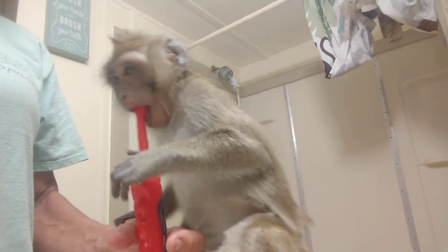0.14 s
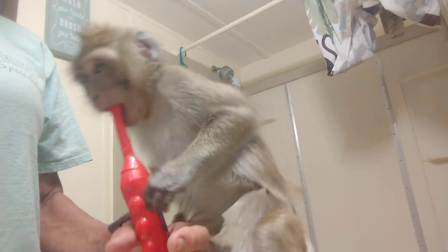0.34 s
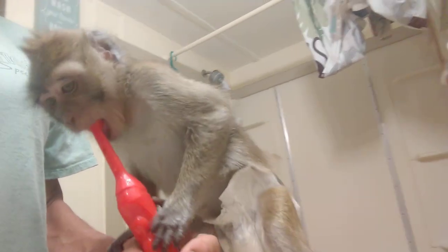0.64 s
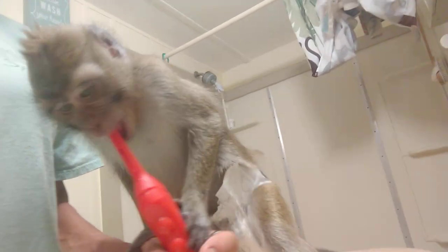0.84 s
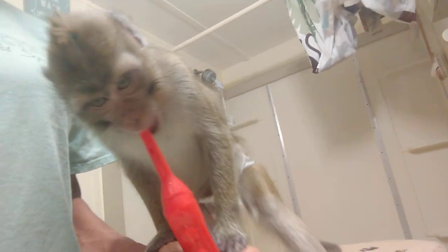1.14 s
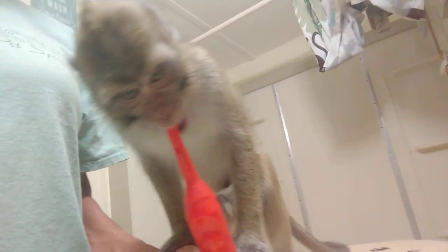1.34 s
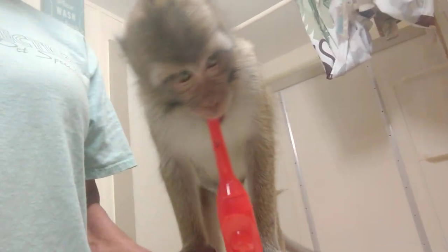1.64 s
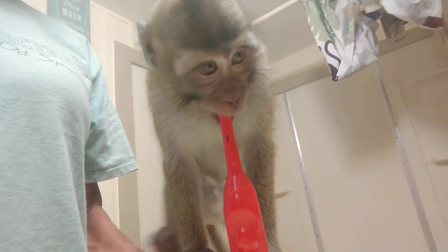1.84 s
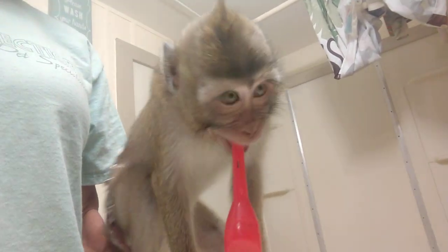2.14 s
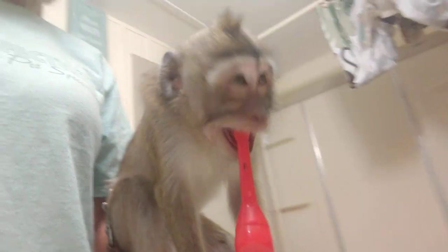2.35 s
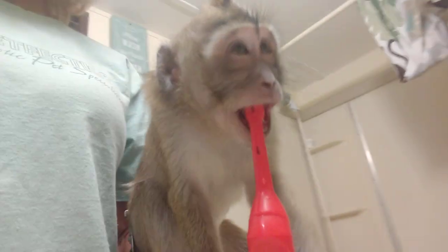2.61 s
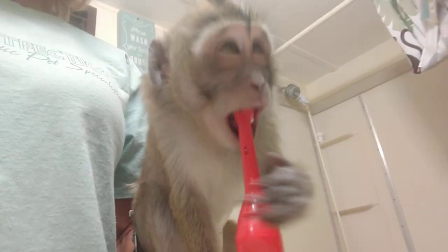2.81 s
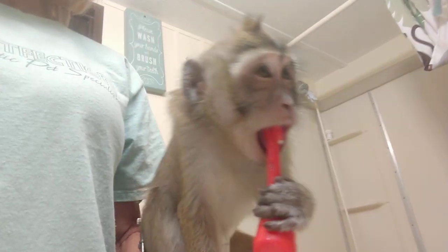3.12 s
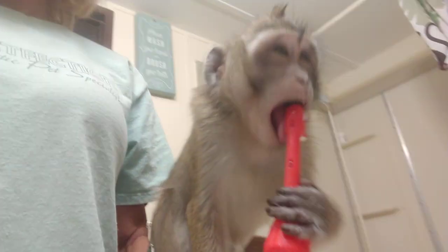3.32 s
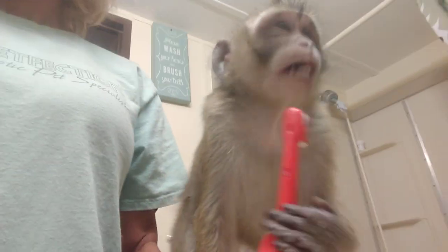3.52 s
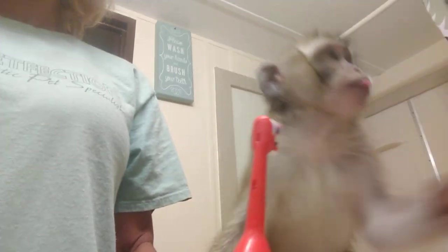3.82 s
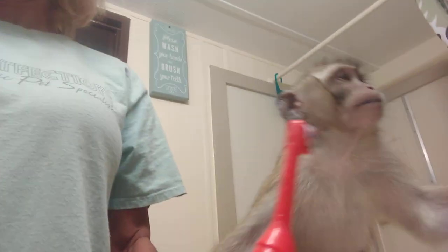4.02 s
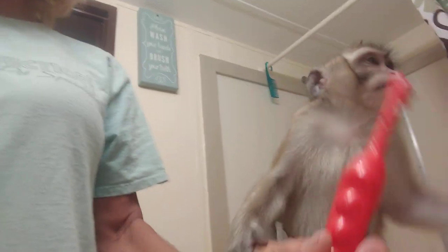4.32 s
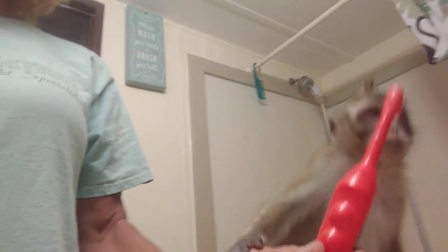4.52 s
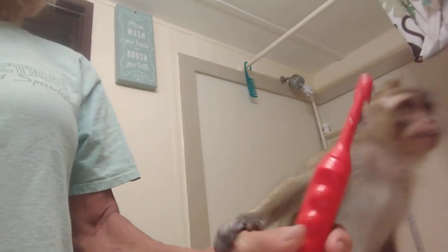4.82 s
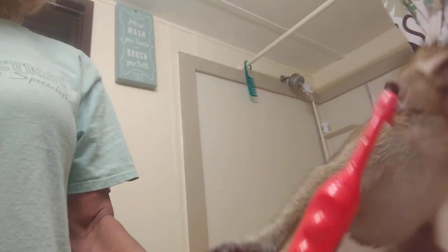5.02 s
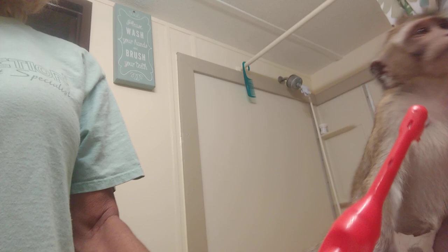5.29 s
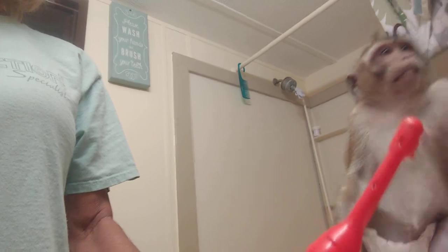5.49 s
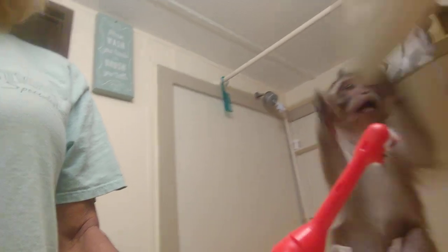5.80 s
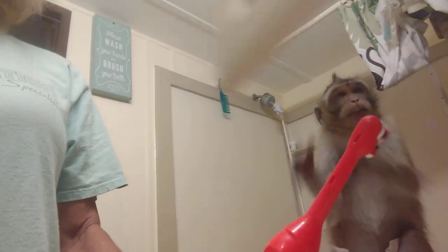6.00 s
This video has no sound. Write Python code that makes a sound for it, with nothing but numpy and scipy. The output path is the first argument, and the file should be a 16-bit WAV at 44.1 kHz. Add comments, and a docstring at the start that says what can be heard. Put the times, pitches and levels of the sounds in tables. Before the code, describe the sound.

In a small hard-walled bathroom, a battery toothbrush buzzes continuously very near the microphone. A monkey's bites drag the motor down in pitch and make the buzz rough and clattery, with brief slips and surges. Once released, it runs steadier, clearer and slightly higher, with thin singing tones. Paws then scrape plastic in quick dry scuffs, with soft low bumps as the animal clambers away.

```python
"""Monkey chewing a battery toothbrush

In a small bathroom a brush buzzes while a monkey chews on its head, then the monkey clambers off.
The buzz is two gear knocks a turn ringing through a shell; bites slow the motor and roughen the strokes.
Hum and singing tones follow the turns. Scuffs and the rustle are shaped noise, bumps are short low booms."""
import sys
import numpy as np
from scipy import signal
from scipy.fft import rfft, irfft
from scipy.io import wavfile
from scipy.ndimage import uniform_filter1d, map_coordinates

SR = 44100
rng = np.random.default_rng(int(sys.argv[2]) if len(sys.argv) > 2 else 0)


def store_pcm(level_fs):
    """Save levels as 16-bit WAV."""
    pcm = np.round(np.clip(level_fs, -1, 1) * 32767).astype(np.int16)
    wavfile.write(sys.argv[1], SR, np.atleast_2d(pcm).T)


N = 271215
TIME = np.arange(N) / SR

# motor speed, dragged down by each bite: time_s, speed_turns_per_s
MOTOR_SPEED = [(0.0, 82.4), (0.2, 82.6), (0.42, 82.7), (0.58, 78.8), (0.7, 81.7), (0.78, 81.3),
               (0.88, 83.7), (0.98, 84.5), (1.12, 68.2), (1.25, 64.5), (1.48, 67.5), (1.8, 65.9),
               (1.9, 73.9), (2.02, 81.4), (2.14, 82.8), (2.28, 81.5), (2.52, 69.2), (2.6, 67.9),
               (2.7, 78.7), (2.85, 84.1), (3.02, 85.1), (3.16, 80.5), (3.33, 80.0), (3.44, 82.5),
               (3.58, 85.8), (4.2, 86.5), (4.8, 86.7), (6.15, 87.6)]
# how far the mouth encloses the head: time_s, bite (0-1)
BITE = [(0, 0.37), (.45, 0.89), (3.35, 0.76), (3.74, 0.27), (6.15, 0.07)]
# where the brush is: time_s, left_lag_ms, left_minus_right_db
PLACE = [(0, 0.066, -6), (2.5, -0.13, -5), (5.2, -0.1, -4.5), (6.15, -0.16, -4.5)]
# soft stroke against the hard one, clacking when the teeth press: time_s, level_db (before dulling)
SOFT_STROKE_LEVEL = [(0, 5), (.4, 1), (.6, 2.5), (.71, 5.5), (.8, 4.5), (1.15, 4.5), (1.3, -3), (1.85, 1),
                     (2.3, -3.5), (2.64, -4), (2.71, -4), (2.78, -4.5), (3.05, -7.5), (3.13, 1.5),
                     (3.4, -1), (3.7, -4.5), (6.15, -3)]
# colour of the brush running free: pitch_hz, level_db
FREE_COLOUR = [(150, -74), (450, -43), (650, -33.5), (820, -19), (980, -21.5), (1130, -14), (1600, -16.5),
               (2000, -10), (2300, -9), (3000, -6), (3600, -14.5), (4400, -13.5), (5100, -7), (6000, -16.5),
               (7000, -5), (8200, -7), (10000, -24), (12000, -14), (13800, -10.5), (14900, -9),
               (15400, -27), (16000, -13)]
# colour of the brush bitten: pitch_hz, level_db
BITTEN_COLOUR = [(150, -70), (500, -47), (660, -27.5), (900, -29.5), (1270, -15.5), (1600, -18.5),
                 (2300, -7.5), (2900, -7), (3500, -6.5), (4400, -3), (5300, -1.5), (6200, -1.5), (7300, -2),
                 (10000, -10), (12600, -5), (14700, -9), (16000, -6.5)]
# resonances of the undamped shell: pitch_hz, width_hz, level_db
SHELL = [(1896, 520, 5), (2380, 124, -12), (2716, 200, -9.5), (4113, 290, 4.5), (4980, 280, 0.5),
         (6640, 270, -8)]
# resonances let out by each hold of jaw or hand: start_s, end_s, first_hz, last_hz, width_hz, level_db
HOLDS = [(0, 0.467, 7300, 7140, 400, -4.5), (0.275, 0.92, 5360, 5300, 463, 9),
         (0.424, 0.63, 2120, 2270, 250, 4), (0.443, .9, 7100, 7240, 300, 2),
         (0.927, 1.109, 5140, 5550, 1000, 11), (1.064, 1.36, 5400, 5450, 900, -9),
         (0, 0.457, 2420, 2370, 200, 6), (0, .42, 1270, 1270, 199, 3), (1, 1.213, 3100, 3330, 300, 6.5),
         (1.05, 1.547, 8850, 9800, 600, -2), (1.414, 1.646, 1370, 1410, 198, 8),
         (1.655, 2.01, 5030, 5200, 250, 6), (2.283, 2.597, 6900, 6500, 396, -1),
         (2.624, 2.9, 5630, 5400, 375, 6), (2.665, 2.975, 7710, 8000, 370, 9),
         (2.945, 3.475, 7100, 5960, 350, 2.5), (3.068, 3.733, 12100, 14400, 900, 2),
         (3.133, 3.564, 1770, 1770, 149, 1), (3.68, 4.25, 4900, 4830, 400, -10),
         (3.654, 5.196, 2100, 2030, 200, -9), (4.598, 5.752, 5020, 4830, 400, 2.5),
         (5.704, 6.25, 2410, 2520, 152, 6.5)]
# ring of the undamped head at each hard stroke: pitch_hz, width_hz, level_db (before the low cut)
HEAD_TICK = [(5160, 730, -0.5), (5090, 310, -5), (14860, 2200, -3)]
# slow level of the buzz, before load and contact: time_s, lows_db, middle_db, treble_db
BUZZ_LEVEL = [(0, -43.5, -39.5, -48), (.5, -44.5, -36.5, -45), (1.3, -42.5, -35.5, -43.5),
              (1.85, -43, -36, -42), (2.6, -40, -35.5, -39.5), (3.198, -38.5, -34, -39.5),
              (3.631, -42, -36.5, -35.5), (3.73, -37.5, -32, -36.5), (4.302, -37, -35, -38.5),
              (4.85, -41, -34, -40.5), (5.3, -40.5, -34.5, -37.5), (6.15, -36.5, -33, -37.5)]
# answer of lows, middle, treble (one row each): load_db per turn/s of slowing, contact_share (ratio)
TEETH_ANSWER = [(.02, .66), (.11, 1.0), (.28, 1.25)]
# head slides onto the lips, then snaps back on the teeth: start_s, caught_s, level_db (before contact_share)
SLIPS = [(0.4, 0.435, -2), (0.67, 0.697, -5.5), (0.786, 0.93, -8), (1.847, 2.127, -4), (2.045, 2.269, -5.5),
         (3.05, 3.097, -3)]
# head rattles hard on the teeth: peak_s, rise_and_fall_s (each), level_db (before contact_share)
SURGES = [(0.614, 0.072, 3), (.735, 0.021, 1.5), (1.091, 0.098, 7), (2.46, 0.048, 3.5), (2.84, 0.069, 4.5)]
# motor hum, before its level curve: turn_multiple (ratio), level_db
HUM = [(1, -87), (2, -81), (3, -69), (4, -78.5), (5, -82), (6, -93)]
# level curve of the hum: time_s, gain_db
HUM_LEVEL = [(0, -15), (.5, -3), (.95, -10), (1.15, 4), (1.5, 2), (1.75, -11), (2.35, 2.5), (3.05, 1.5),
             (3.3, -2), (6.15, -8)]
# tones of the unloaded handle: turn_multiple (ratio), upright_db, tilted_db
HANDLE_TONES = [(12, -66, -54), (13, -43.5, -50), (14, -65, -44.5), (16, -43, -43.5), (20, -60, -64),
                (22, -37, -56), (27, -45, -45), (28, -47, -45.5), (35, -35, -60), (48, -35.5, -37),
                (55, -30.5, -40), (58, -37, -40)]
# how far the handle leans over: time_s, tilt (0-1)
HANDLE_TILT = [(4.2, 0), (5.3, 0.96)]
# paws scuffing plastic, before the room: start_s, level_db, decay_s, treble_db
SCUFFS = [(4.105, -34, 0.0076, -12), (4.242, -40, 0.035, 3), (4.308, -29.5, 0.01, -7),
          (4.353, -25, 0.0058, 3.5), (4.411, -34.5, 0.026, -27), (4.476, -32, 0.029, -2),
          (4.567, -24.5, 0.014, -3), (4.635, -45, 0.066, 0), (4.696, -29, 0.028, -11),
          (4.769, -25.5, 0.012, -8), (5.229, -35.5, 0.017, -23)]
# colour of the scuffs: pitch_hz, level_db
SCUFF_COLOUR = [(50, -32), (200, -23.5), (500, -6), (850, 2), (1500, -3.5), (2500, 2), (4000, -1.5),
                (7000, -5), (10000, -4.5), (15000, -2)]
# soft bumps of body and paws, before the room: start_s, level_db, pitch_hz, attack_s, decay_s
BUMPS = [(0.088, -52, 178, .003, 0.047), (0.706, -55, 212, .003, 0.026), (.76, -56, 192, 0.0064, 0.061),
         (2.403, -52, 254, 0.0035, 0.016), (2.429, -56, 197, 0.0079, 0.045),
         (2.532, -54.5, 183, 0.0058, 0.024), (2.871, -61.5, 224, .01, 0.071),
         (3.669, -52.5, 534, .001, 0.0089), (4.307, -52, 244, 0.014, 0.076), (4.405, -52, 207, .012, 0.057),
         (4.472, -52, 195, .012, 0.039), (4.57, -54, 241, 0.0036, 0.066), (4.696, -39, 220, 0.011, 0.02),
         (4.762, -47.5, 209, .012, 0.029), (4.9, -47.5, 215, .004, 0.028), (5.116, -43, 151, .03, 0.027),
         (5.227, -52, 258, 0.0088, 0.021), (5.477, -54, 175, 0.012, 0.028),
         (5.812, -59.5, 141, 0.013, 0.097)]
# faint movements between the bumps, before the room: time_s, level_db
SHUFFLE_LEVEL = [(0, -81.5), (2.1, -84.5), (2.5, -76), (3.15, -79), (3.4, -80.5), (4.1, -84.5), (4.4, -70),
                 (4.9, -81), (6.15, -75.5)]
# colour of the room air: pitch_hz, level_db
AIR_COLOUR = [(30, -19), (70, -13), (150, -18), (300, -9), (600, 4), (2000, -76)]

UNLOADED_TURNS_PER_S, START_TURNS = 85.3, .46
WOBBLE_TURNS, WOBBLES_PER_S = .012, 25   # teeth jostle the gear; scaled by bite squared
# the jaw shifts its grip here: the forward stroke becomes the hard one
FLIP_S, FLIP_LENGTH_S = 2.73, .031
UNEVEN_FREE_DB, UNEVEN_PER_BITE_DB = .45, .15   # slow variation of stroke strength
ROUGH_FREE, ROUGH_PER_BITE = .23, .53   # share of chatter in a stroke
CHATTER_RISE_S, HARD_CHATTER_S, SOFT_CHATTER_S = .0012, .0022, .004
CHATTER_LOW_HZ, SOFT_STROKE_HZ = 750, 5300   # low cut of chatter, high cut of the soft stroke
LOWS_LINGER, LINGER_HZ = 2.6, 1100   # extra delay share of the lows, fading with pitch
SHELL_DAMPING_DB, TICK_DAMPING_DB = -9.5, -12.5   # at a full bite
SHELL_SWAY_DB, SWAYS_PER_S = 2, 6.3
BOUNCE_S, BOUNCE_GRAIN_HZ = .0015, 190   # mean delay of the head's bounces, and its grain
GLANCE_MS = [.358, .85]
GLANCE_FREE_DB, GLANCE_PER_BITE_DB = -13.625, 2.65
GLANCE_SWING_FREE, GLANCE_SWING_PER_BITE = .0644, .14   # share by which the delays swing
CATCH_S = .005
HUM_WAVER_DB, HUM_WAVERS_PER_S = 4, 9
SCUFF_GRAIN_DB, SCUFF_GRAINS_PER_S = 3.2, 350
SHUFFLE_SWING_DB, SHUFFLES_PER_S = 2.5, 6.7
ROOM_T60_S, ROOM_DB = .25, -11   # decay time; reverb under the brush
CUTOFF_HZ = 15850


def toothbrush(turns, bite):
    """A hard and a soft stroke each turn ring the shell, or the head held between the teeth."""
    hard, soft = gear_strokes(turns, bite)
    rough = ROUGH_FREE + ROUGH_PER_BITE * bite
    grip = np.cumsum(3.773 + 7 * bite) / SR   # radians: chewing keeps shifting the contact
    drive = stroke(hard, rough, grip, spread_s=.000894, chatter_s=HARD_CHATTER_S)
    clack = stroke(soft, rough, grip, spread_s=.001222, chatter_s=SOFT_CHATTER_S)
    drive += from_db(in_time(SOFT_STROKE_LEVEL)[0]) * band(clack, SOFT_STROKE_HZ, "low", order=1)
    free = rms_one(coloured(drive, FREE_COLOUR))
    bitten = rms_one(coloured(drive, BITTEN_COLOUR))
    body = shell((1 - bite) * free + bite * bitten, bite)
    body = held_resonances(body)
    tick = head_tick(hard, bite)
    brush = placed(body) + placed([tick, tick], lag_share=.47)
    return bathroom(glancing(brush, bite), ROOM_DB)


def gear_strokes(turns, bite):
    """Forward and return strokes lie half a turn apart and swap hardness when the grip shifts."""
    def uneven_clicks(lag):
        slow_db = (UNEVEN_FREE_DB + UNEVEN_PER_BITE_DB * bite) * wander(N, SR / 60)
        return clicks(turns - lag, uneven_db=.66, jitter_s=.000012) * from_db(slow_db)
    forward, back = uneven_clicks(0), uneven_clicks(.5)
    flipped = np.clip((TIME - FLIP_S) / FLIP_LENGTH_S + .5, 0, 1)
    hard = flipped * forward + (1 - flipped) * back
    soft = flipped * back + (1 - flipped) * forward
    return hard, soft


def clicks(turns, uneven_db, jitter_s):
    """One click per whole turn, placed between samples; play in the gear blurs time and strength."""
    at = np.interp(np.arange(1, int(turns[-1])), turns, np.arange(N))
    chance = rng.standard_normal((len(at), 2))
    at = at + jitter_s * SR * chance[:, 0]
    taps = at.astype(int)[:, None] + np.arange(-8, 9)
    offset = taps - at[:, None]
    sizes = from_db(uneven_db * chance[:, 1:])
    out = np.zeros(N)
    out[np.clip(taps, 0, N - 1)] = sizes * np.sinc(offset) * np.sinc(offset / 9)   # windowed sinc
    return out


def stroke(hits, rough, grip, spread_s, chatter_s, size=2048):
    """A knock that repeats each turn and shifts with the grip, plus chatter that never repeats; both ears."""
    hz = np.fft.rfftfreq(size, 1 / SR)
    shape = rattle(spread_s * (1 + LOWS_LINGER * np.exp(-hz / LINGER_HZ)), grain_hz=340.07)
    bend_s = .0008115 * (hz / hz[-1]) ** .2535   # each grip delays the treble in its own way
    # three grips crossfade in a circle
    shares = (1 + np.cos(grip + 2 * np.pi * np.arange(3)[:, None] / 3)) / 2

    def knock_at_ear():
        total = 0
        for share in shares:
            response = irfft(shape * rattle(bend_s, grain_hz=600.9))[:size // 2]
            total = total + share * signal.oaconvolve(hits, response)[:N]
        return total
    knock = np.array([knock_at_ear() for _ in range(2)])
    gate = signal.oaconvolve(hits, burst(0, CHATTER_RISE_S, chatter_s)[:SR // 20])[:N]
    # tiny uneven contacts at many spots, so the ears get them only partly alike
    contacts = rng.standard_normal(N) + 3.4 * rng.standard_normal((2, N))
    contacts = contacts * from_db(1.6 * wander(N, SR / 9000))
    chatter = band(gate * contacts, CHATTER_LOW_HZ, "high", order=1)
    return np.sqrt(1 - rough ** 2) * rms_one(knock) + rough * rms_one(chatter)


def rattle(spread_s, grain_hz, size=2048):
    """One knock through the plastic as a spectrum: most frequencies come out at once, some linger."""
    delay = spread_s * wander(size // 2 + 1, grain_hz * size / SR) ** 2
    return np.exp(-2j * np.pi * np.cumsum(delay) * SR / size)


def shell(sound, bite):
    """The shell resonates with a swaying ring as the brush turns; the mouth damps it."""
    ring = 0
    for hz, width, db in SHELL:
        level_db = db + SHELL_DAMPING_DB * bite + SHELL_SWAY_DB * wander(N, SR / SWAYS_PER_S)
        ring = ring + from_db(level_db) * resonance(sound, hz, width)
    return sound + ring


def held_resonances(sound):
    """Each hold of jaw or hand fades in a gliding resonance and lets it go."""
    for start, end, from_hz, to_hz, width, db in HOLDS:
        now = (TIME > start) & (TIME < end)
        fade = np.minimum(np.minimum(TIME[now] - start, end - TIME[now]) / .063, 1)
        hz = np.linspace(from_hz, to_hz, now.sum())
        sound[:, now] += fade * from_db(db) * gliding(sound[:, now], hz, width)
    return sound


def head_tick(hard, bite):
    """The hard stroke makes the head ring, smeared by its bounces and damped by the bite."""
    bounces = irfft(rattle(BOUNCE_S, BOUNCE_GRAIN_HZ))[:SR // 50]
    bouncing = signal.oaconvolve(hard, bounces)[:N]
    tick = sum(from_db(db) * rms_one(resonance(bouncing, hz, width)) for hz, width, db in HEAD_TICK)
    return band(tick, 4160, "high", order=3) * from_db(TICK_DAMPING_DB * bite)


def glancing(pair, bite):
    """The treble also glances off the face and hands; these short paths shift as the head moves."""
    treble, out = band(pair, 2330, "high"), pair
    swing = GLANCE_SWING_FREE + GLANCE_SWING_PER_BITE * bite
    gain = from_db(GLANCE_FREE_DB + GLANCE_PER_BITE_DB * bite)
    for ms in GLANCE_MS:
        lag = ms * SR / 1000 * (1 + swing * wander(N, SR / 4))
        echo = np.array([map_coordinates(x, [np.arange(N) - lag], order=3) for x in treble])
        out = out + gain * echo
    return out


def levelled(sound, slowing):
    """Lows, middle and treble each keep their level; load and hard contact raise the treble most."""
    def below(hz):
        return signal.sosfiltfilt(signal.butter(6, hz, fs=SR, output="sos"), sound)
    low, below_top = below(3000), below(8500)
    middle = (below_top - low) * from_db([[1], [0]])   # left, right
    treble = (sound - below_top) * from_db([[-2], [0]])
    out, contact = 0, contact_db()
    for part, db, (load_db, share) in zip((low, middle, treble), in_time(BUZZ_LEVEL), TEETH_ANSWER):
        power = uniform_filter1d(np.mean(part ** 2, axis=0), size=2000)
        power = uniform_filter1d(power, size=1500)
        gain = from_db(db + load_db * slowing + share * contact)
        out = out + gain * part / np.sqrt(power + 1e-12)
    return out


def contact_db():
    """The buzz sinks as the head slips onto the lips and swells as it rattles on the teeth."""
    total = np.zeros(N)
    for start, caught, db in SLIPS:
        total += db * np.interp(TIME, [start, caught, caught + CATCH_S], [0, 1, 0])
    for peak, rise, db in SURGES:
        total += db * np.maximum(1 - np.abs(TIME - peak) / rise, 0)
    return total


def hum(turns, bite):
    """The shaking handle gives wavering low tones, and higher ones once nothing damps it."""
    def tones(rows, waver_db, per_s):
        total = 0
        for multiple, db in rows:
            gain = from_db(db + waver_db * wander(N, SR / per_s))
            total = total + gain * np.sin(2 * np.pi * (multiple * turns + rng.random()))
        return total
    tilt, = in_time(HANDLE_TILT)
    leaning = [(multiple, upright + tilt * (tilted - upright)) for multiple, upright, tilted in HANDLE_TONES]
    singing = (1 - bite) ** 4 * tones(leaning, 2, 4)
    low_tones = from_db(in_time(HUM_LEVEL)[0]) * tones(HUM, HUM_WAVER_DB, HUM_WAVERS_PER_S)
    return low_tones + placed([singing, singing], lag_share=.96)


def scuffs():
    """Paws drag over plastic: grainy bursts, dull or bright."""
    noise = rng.standard_normal(N) + .35 * rng.standard_normal((2, N))
    noise = noise * from_db(SCUFF_GRAIN_DB * wander(N, SR / SCUFF_GRAINS_PER_S))
    grains = rms_one(coloured(noise, SCUFF_COLOUR))
    dull = band(grains, 3000, "low")
    bright = grains - dull
    out = 0
    for s, db, decay, treble_db in SCUFFS:
        out = out + from_db(db) * burst(s, .0012, decay) * (dull + from_db(treble_db) * bright)
    return bathroom(placed(out), wet_db=1.5)


def bumps():
    """Soft blows set the wall panels booming briefly."""
    out = 0
    for s, db, hz, attack, decay in BUMPS:
        boom = band(rng.standard_normal(N), [hz * .64, hz * 1.194], "band")
        out = out + from_db(db) * burst(s, attack, decay) * rms_one(boom)
    return bathroom(out, wet_db=-8)


def shuffling():
    """The monkey never sits still: a faint low rustle that comes and goes."""
    rustle = rms_one(band(rng.standard_normal(N), [105, 330], "band", order=3))
    level_db = in_time(SHUFFLE_LEVEL)[0] + SHUFFLE_SWING_DB * wander(N, SR / SHUFFLES_PER_S)
    return bathroom(from_db(level_db) * rustle, wet_db=8.5)


def room_air():
    """Faint low noise, mostly different at each ear."""
    noise = rng.standard_normal(N) + 9.1 * rng.standard_normal((2, N))
    return from_db(-87) * rms_one(band(coloured(noise, AIR_COLOUR), 1000, "low"))


def bathroom(x, wet_db):
    """Close hard walls: a dense short tail, different at each ear."""
    age = TIME[:SR // 2]
    tail = rng.standard_normal((2, len(age))) * from_db(-60 * age / ROOM_T60_S) * (age > .002)
    tail /= np.sqrt(np.sum(tail ** 2, axis=1, keepdims=True))
    return x + from_db(wet_db) * signal.fftconvolve(np.atleast_2d(x), tail, axes=1)[:, :N]


def placed(pair, lag_share=1):
    """Place a sound by a time lag and a level difference between the ears."""
    lag_ms, pan_db = in_time(PLACE)
    half = lag_share * lag_ms * SR / 2000   # samples, half the lag at each ear
    ears = []
    for x, side in zip(pair, (1, -1)):
        shifted = map_coordinates(x, [np.arange(N) - side * half], order=3)
        ears.append(shifted * from_db(side * pan_db / 2))
    return np.array(ears)


def from_db(db):
    """Decibels to gain."""
    return 10 ** (np.asarray(db) / 20)


def rms_one(x):
    """Scale to unit power."""
    return x / np.sqrt(np.mean(x ** 2) + 1e-20)


def in_time(rows):
    """Columns of a curve at every sample."""
    s, *columns = np.transpose(rows)
    return [np.interp(TIME, s, c) for c in columns]


def coloured(x, points):
    """Give a sound a smooth spectrum, with all ringing after the cause (minimum phase)."""
    hz, db = np.transpose(points)
    size = 2048
    bins = np.maximum(np.fft.rfftfreq(size, 1 / SR), 1)
    gain = from_db(np.interp(np.log(bins), np.log(hz), db))
    cepstrum = irfft(np.log(gain))[:size // 2]
    response = irfft(np.exp(2 * rfft(cepstrum, size) - cepstrum[0]))
    return np.apply_along_axis(signal.oaconvolve, -1, x, response)[..., :N]


def band(x, hz, kind, order=2):
    """Butterworth filter."""
    return signal.sosfilt(signal.butter(order, hz, kind, fs=SR, output="sos"), x)


def resonance(x, hz, width_hz):
    """Two-pole resonance with gain near 1 on top."""
    r = np.exp(-np.pi * width_hz / SR)
    zeros = np.array([1, 0, -1]) * (1 - r * r) / 2
    return signal.lfilter(zeros, [1, -2 * r * np.cos(2 * np.pi * hz / SR), r * r], x)


def gliding(x, hz, width_hz):
    """A resonance whose centre follows hz, made by shifting it to zero and back; gain near 1 on top."""
    r, carrier = np.exp(-np.pi * width_hz / SR), np.exp(2j * np.pi * np.cumsum(hz) / SR)
    return 2 * (carrier * signal.lfilter([1 - r], [1, -r], x * carrier.conj())).real


def wander(size, step):
    """Smooth chance with a new value about every step points; spread 1."""
    return rms_one(signal.resample(rng.standard_normal(int(size / step) + 2), size))


def burst(s, rise, decay):
    """Envelope that rises at s and dies away; top at 1."""
    age = np.maximum(TIME - s, 0)
    shape = (1 - np.exp(-age / rise)) * np.exp(-np.minimum(age / decay, 20))
    return shape / shape.max()


def scene():
    """Brush, monkey and the faint air of the room."""
    bite, = in_time(BITE)
    speed, = in_time(MOTOR_SPEED)
    slowing = np.maximum(UNLOADED_TURNS_PER_S - speed, 0)
    wobble = WOBBLE_TURNS * bite ** 2 * wander(N, SR / WOBBLES_PER_S)
    turns = np.cumsum(speed) / SR + START_TURNS + wobble
    brush = levelled(toothbrush(turns, bite), slowing) + hum(turns, bite)
    monkey = scuffs() + bumps() + shuffling()
    return brush + monkey + room_air()


def record(dry):
    """The microphone loses the deep bass; the top is cut steeply."""
    thin = band(dry, 41, "high", order=3)
    return signal.sosfilt(signal.ellip(12, .1, 90, CUTOFF_HZ, fs=SR, output="sos"), thin)


dry = scene()
out = record(dry)
store_pcm(out)
```